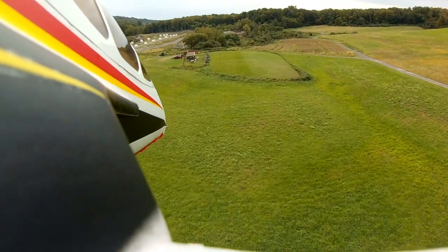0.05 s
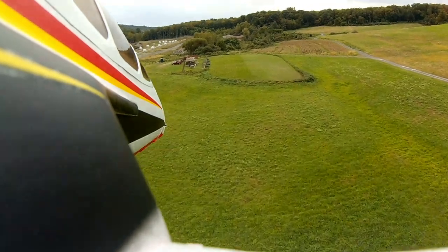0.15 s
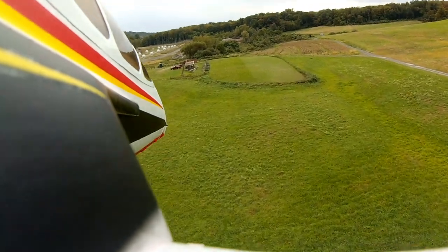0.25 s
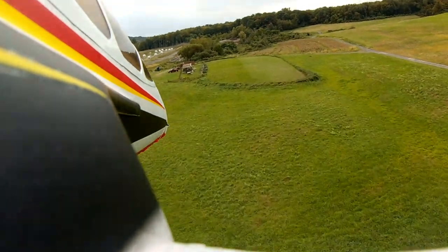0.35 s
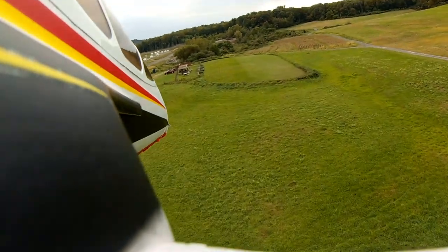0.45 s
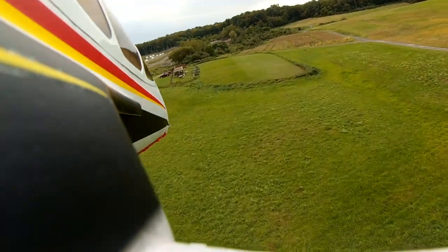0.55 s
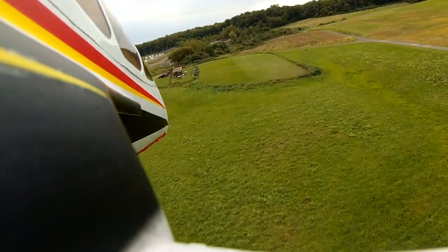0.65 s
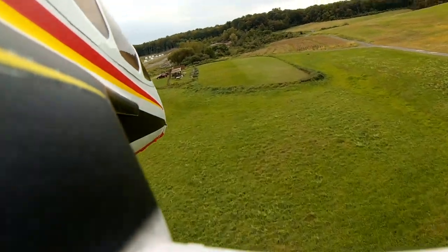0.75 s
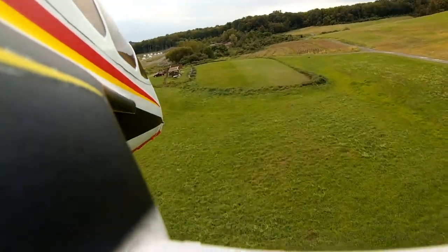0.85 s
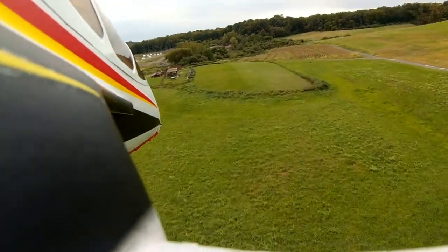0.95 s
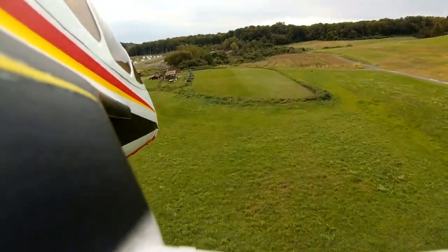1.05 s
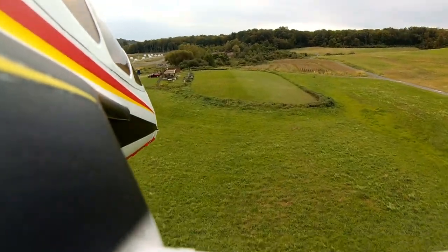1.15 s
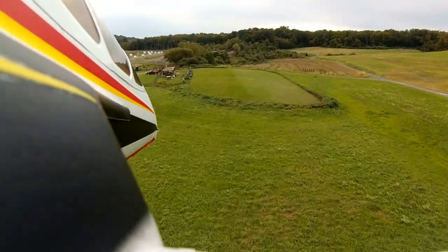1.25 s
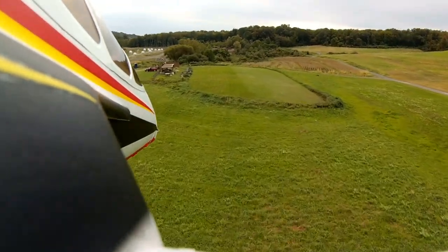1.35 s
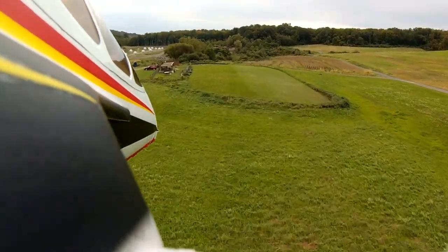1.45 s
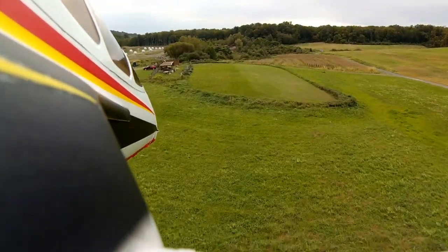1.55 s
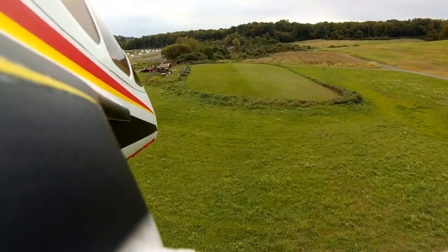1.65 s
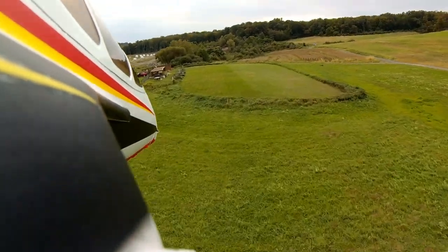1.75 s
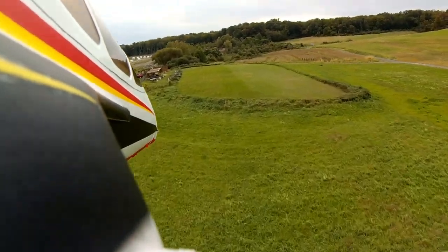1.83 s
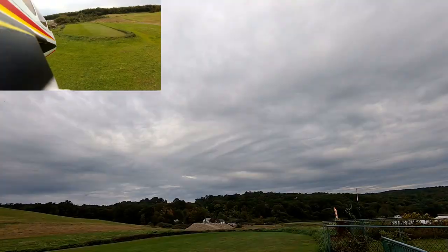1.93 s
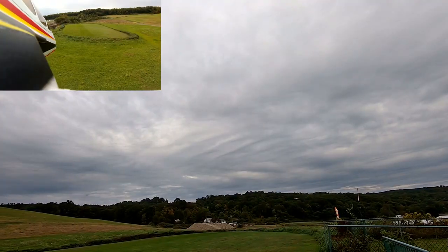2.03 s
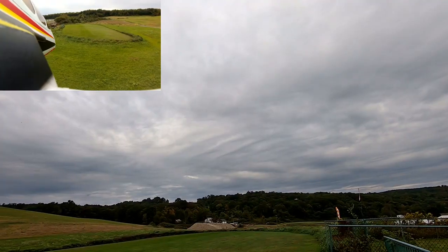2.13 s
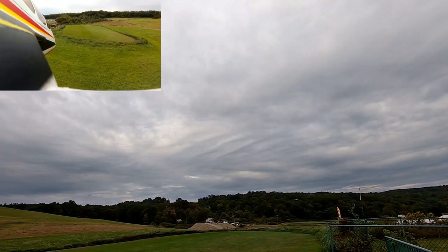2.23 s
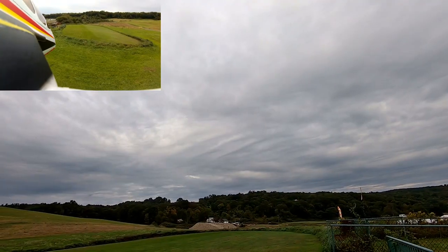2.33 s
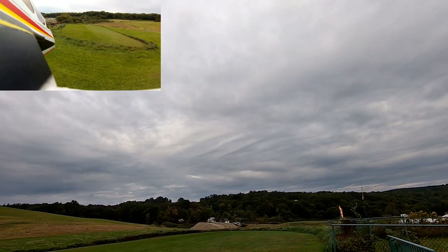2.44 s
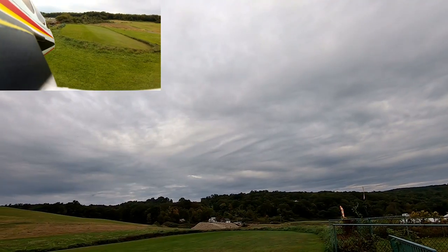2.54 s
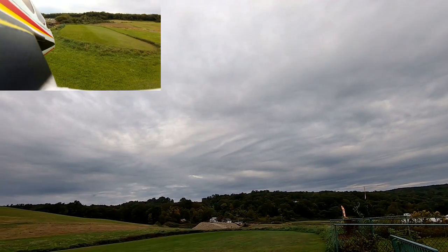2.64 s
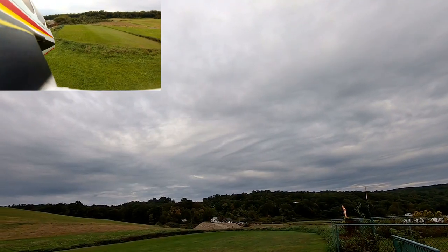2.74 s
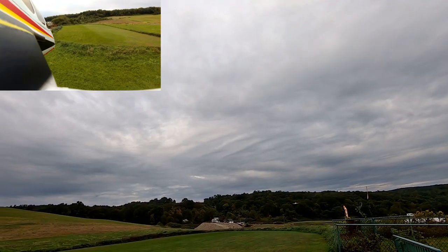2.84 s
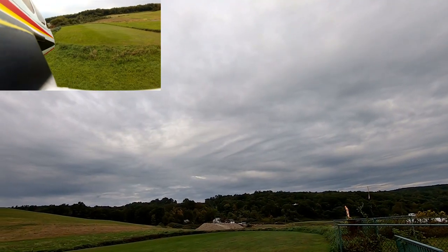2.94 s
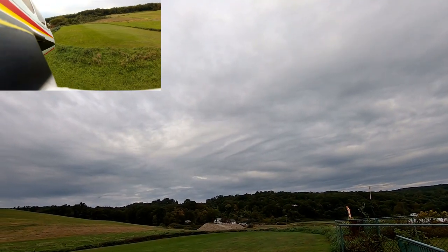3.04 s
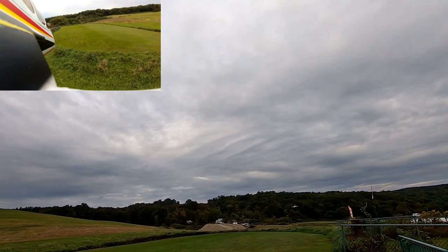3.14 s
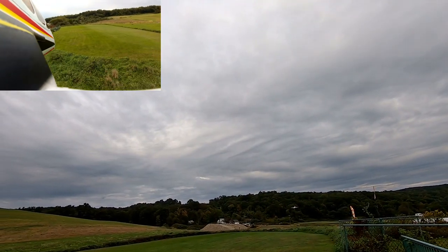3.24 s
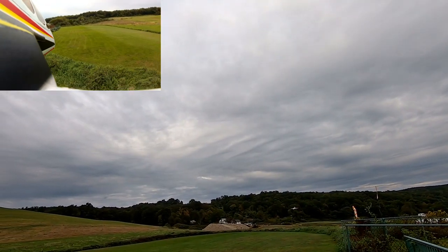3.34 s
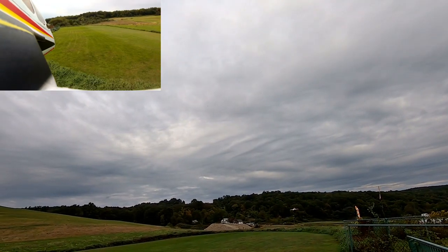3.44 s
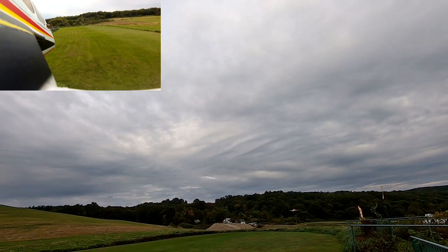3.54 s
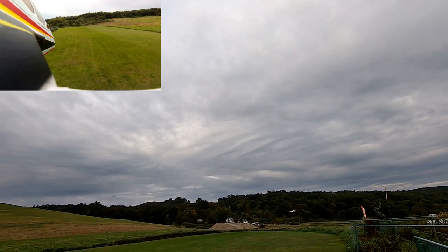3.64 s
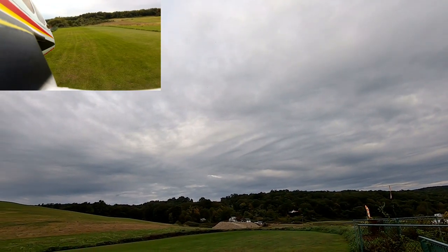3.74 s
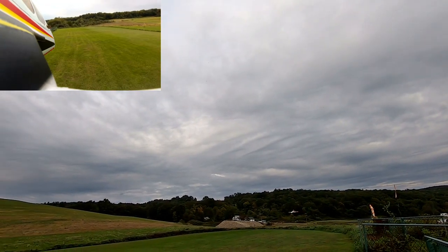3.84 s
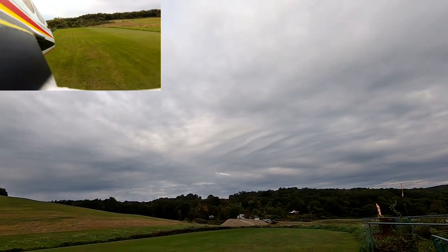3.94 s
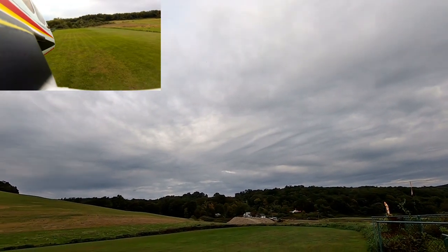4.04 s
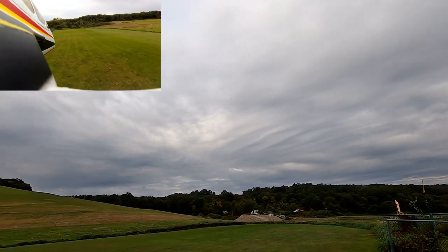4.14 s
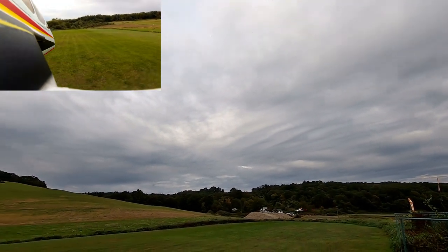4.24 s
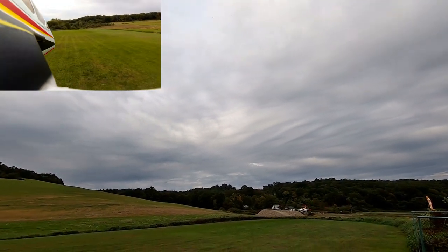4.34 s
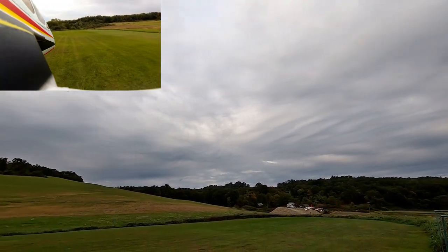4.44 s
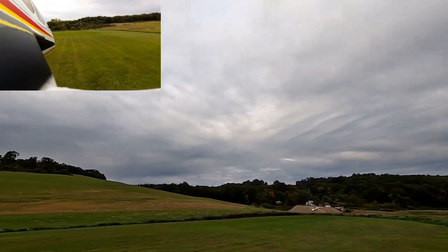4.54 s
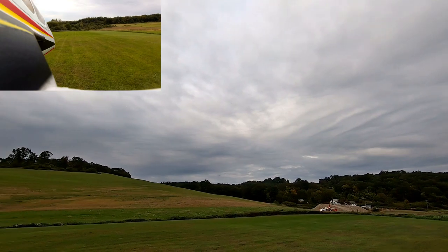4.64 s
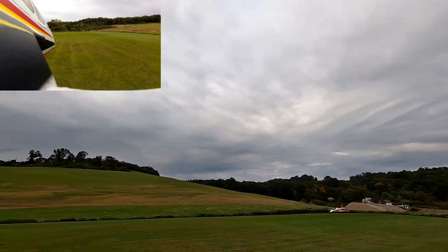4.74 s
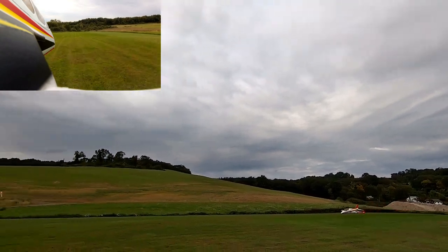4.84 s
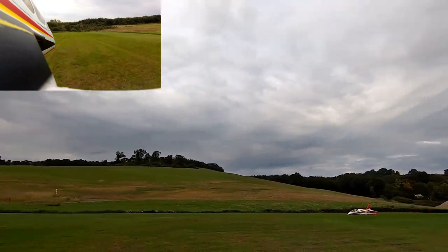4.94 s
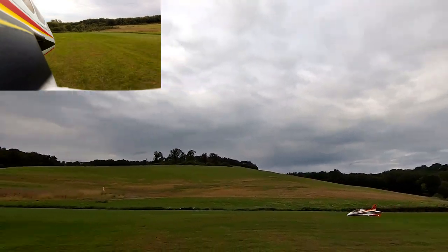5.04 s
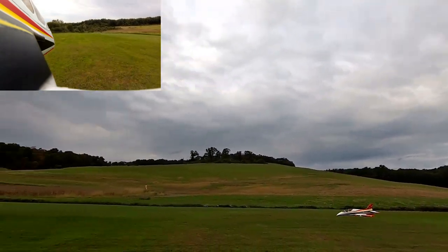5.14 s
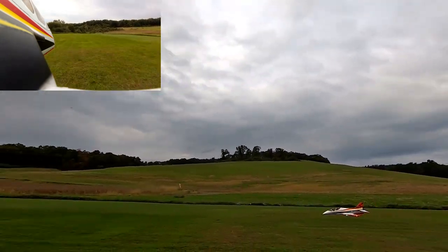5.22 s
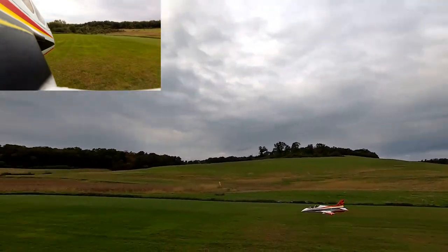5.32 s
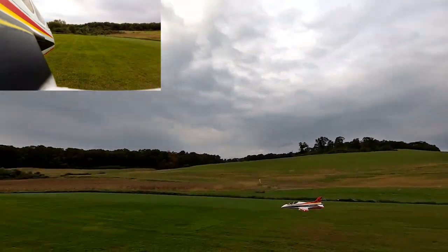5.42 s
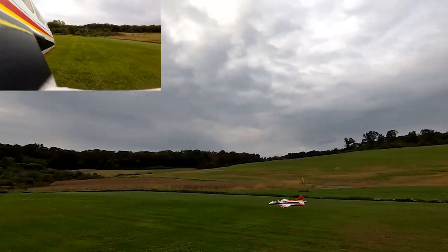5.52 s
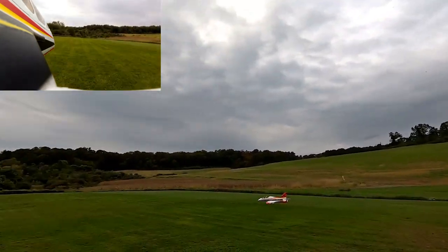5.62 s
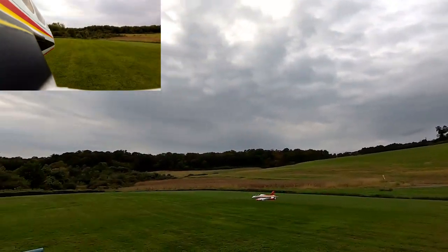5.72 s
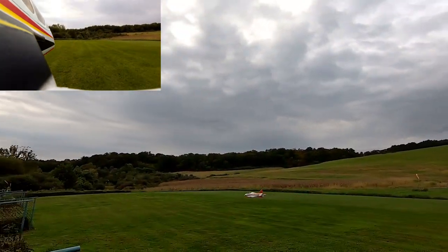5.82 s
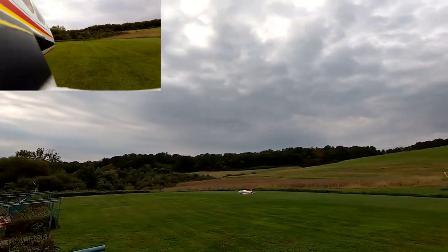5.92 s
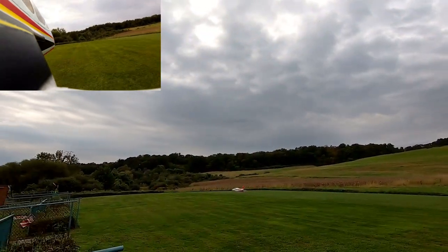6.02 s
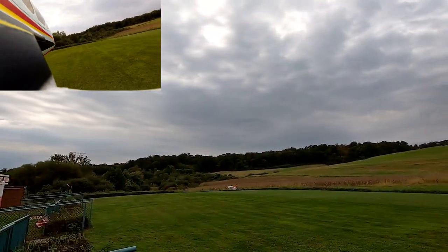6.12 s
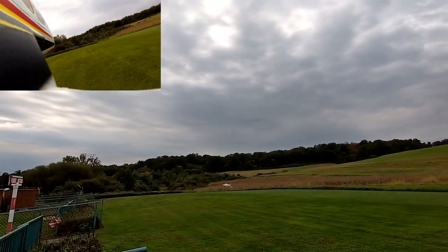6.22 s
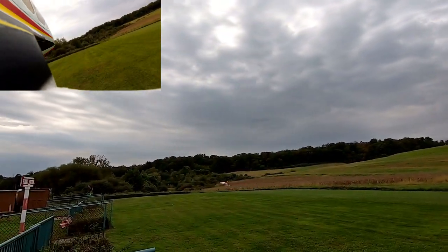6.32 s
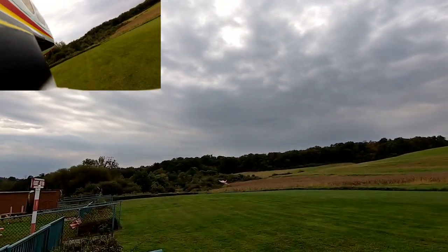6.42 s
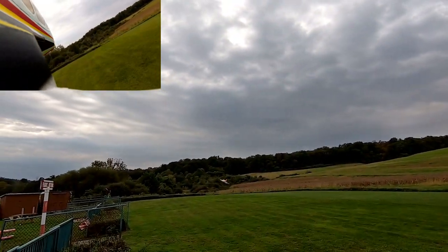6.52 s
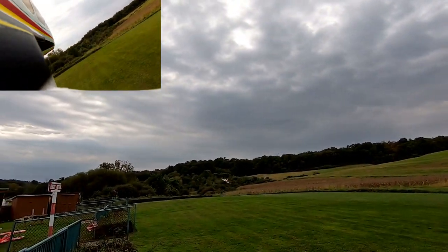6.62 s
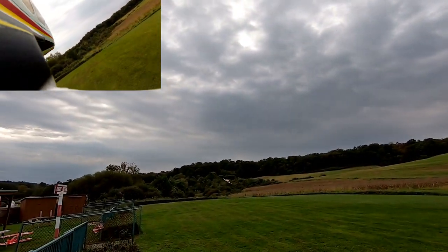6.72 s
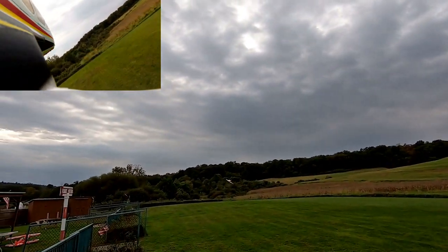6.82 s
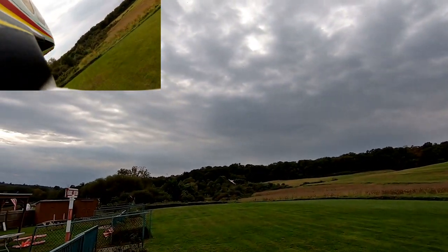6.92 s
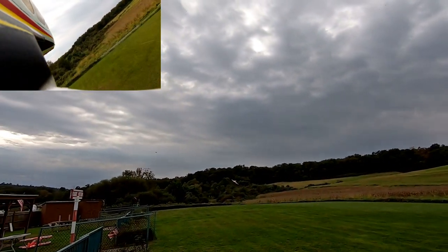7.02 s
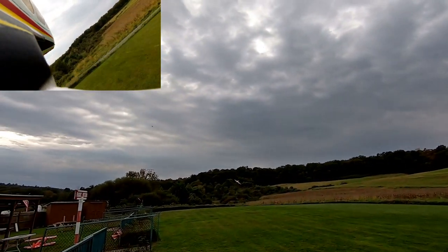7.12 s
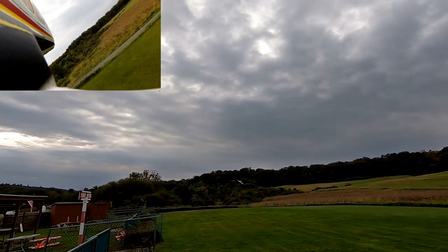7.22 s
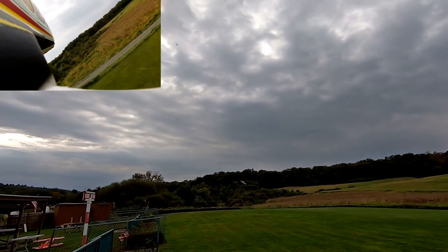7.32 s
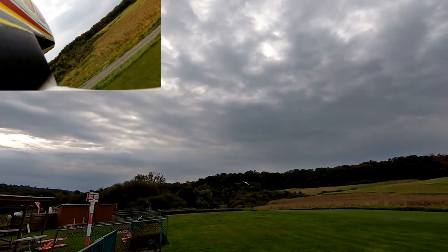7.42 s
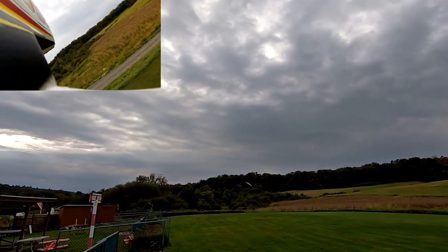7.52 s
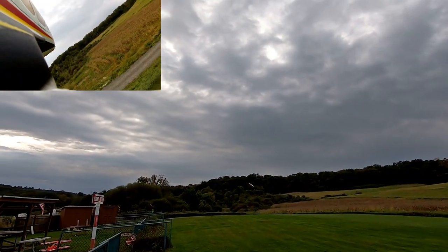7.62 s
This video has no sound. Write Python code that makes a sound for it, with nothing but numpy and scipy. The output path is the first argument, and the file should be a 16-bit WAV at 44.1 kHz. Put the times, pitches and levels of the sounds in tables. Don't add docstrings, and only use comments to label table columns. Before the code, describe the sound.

Outdoors over a grass field, a far engine drones and throttles back while a cricket trills faintly. A small ducted-fan jet approaches as a thin, hollow hiss, its ground echo sweeping through the noise. It bursts past close by, whine jumping up in pitch as it throttles up, then fades quickly. A camera microphone catches finger ticks and light wind.

```python
import sys
import numpy as np
from scipy import signal
from scipy.fft import rfft, irfft
from scipy.io import wavfile
from scipy.ndimage import uniform_filter1d, map_coordinates

SR = 44100
rng = np.random.default_rng(int(sys.argv[2]) if len(sys.argv) > 2 else 0)


def volts_from_db(level):
    exponent = np.asarray(level, float) / 20
    return 10 ** exponent


def to_wav(sig):
    pcm = np.clip(np.atleast_2d(sig), -1, 1) * 32767
    pcm = np.round(pcm).astype(np.int16)
    wavfile.write(sys.argv[1], SR, pcm.T)


N = 338230

# (time [s], nearness [dB], exhaust turned to camera [dB], left-right [dB])
FLIGHT = [(0, -47.5, -4, -5), (.7, -35.5, -9.5, -4.5), (1.41, -33.5, -8, -6.5), (2.41, -27, -8, -6.5),
          (3.35, -18, -10, -6.5), (4.02, -17, -7, -7.5), (4.83, -12, -2.5, -10), (5.08, -11, -0.5, -9),
          (5.42, -12.5, 3.5, -10), (5.7, -3.5, 3.5, -9), (5.94, -1, -2.6, -8.5), (6.13, -1.5, 0.5, -6.5),
          (6.41, -4.5, 1, -5.5), (6.86, -11.5, 4.5, -5), (7.09, -13.5, 5, -4.5), (7.4, -21.5, 10, -4.5),
          (7.67, -29.5, 13.5, -3)]
# (time [s], extra path delay [ms])
ECHO_DELAY = [(0, .92), (1.5, .795), (1.9, .755), (2.7, .63), (3.5, .55), (3.9, .52), (4.5, .51),
              (5.1, .715), (5.34, .83), (5.58, .875), (5.7, .9), (5.82, .865), (5.94, .77), (6.18, .695),
              (6.4, .68), (6.54, .71), (6.78, .82), (7.67, 1.07)]
# (frequency [Hz], density [dB per Hz]); duct at approach speed
ROAR = [(240, -49.5), (400, -11), (424, -14), (463, -17), (616, -5), (745, -2), (850, -4.5), (977, -5),
        (1100, -2.5), (1400, -7.5), (1630, -9), (2170, -13), (2300, -11.5), (2990, -28), (5060, -120)]
DUCT = [(800, -26.5), (1400, -12), (1900, -11.5), (2400, 0), (2900, -0.5), (3600, -3.5), (4600, -12),
        (6000, -18.5), (10000, -120)]
HISS = [(2590, -14), (4400, -2), (6670, -1.5), (7460, 0.5), (8340, -13), (8900, -20), (11600, -63.5),
        (19600, -120)]
TOP_HISS = [(5120, -56), (8700, 0.5), (9370, -1), (10700, -8.5), (11900, -18.5), (13800, -18.5),
            (15400, -31)]
# (level at loudest [dB], nearness slope [dB/dB], exhaust slope [dB/dB])
LAYERS = [
    (-39, 0.68, 1),
    (-37, 0.5845, 0.103),
    (-34.5, 1, 0),
    (-47, 1.34, 0.25),
]
# (time [s], half length [s], frequency [Hz], width [log Hz], level
# [dB])
BANDS = [
    (0, 3.5, 760, .08, 8),
    (4.3, .6, 2300, .3, 3),
    (4.9, .6, 11000, .25, 3),
    (5.25, .2, 5600, .1, 6),
    (5.47, .16, 545, .09, 10),
    (5.75, .13, 770, .09, 6),
    (6.12, .25, 980, .1, 7),
    (6.0, .8, 1430, .06, -4),
    (7.4, .4, 1270, .1, -6),
]
# (time [s], blade-pass frequency [Hz])
BLADE_PASS = [(0, 2690), (.6, 2813), (1, 2821), (3.6, 2812), (4.6, 2793), (5, 2770), (5.2, 2737),
              (5.37, 2686), (5.44, 2830), (5.5, 2935), (5.64, 3262), (5.8, 3427), (5.92, 3495),
              (5.99, 3720), (6.16, 3773), (6.5, 3746), (6.95, 3721), (7.67, 3706)]
# (time [s], blade-pass level [dB], octave re blade-pass [dB])
BLADE_SONG = [(0, -70, -23), (.7, -68.5, -3), (1.5, -66.5, -3), (2.1, -75.5, -0.5), (2.8, -64, 0.5),
              (3.6, -66.5, -3), (4.3, -50, -4.5), (4.6, -48.5, -14), (4.95, -47.5, -11), (5.28, -50, 2.5),
              (5.53, -46.5, -3.5), (5.6, -35, -8), (5.84, -36.5, -10), (6.1, -33.5, -7), (6.55, -39.5, -1),
              (6.8, -57, -1), (7.28, -51.5, -17), (7.5, -51.5, -26)]
# (hold from [s], hold to [s], level [dB], rise [dB/s], fall [dB/s])
PASSING = [
    (3.4, 5.35, -66.5, 22, 25),
    (5.25, 5.75, -44, 12.5, 19),
]
# (time [s], firing frequency [Hz], level [dB])
DRONE = [(0, 131, -39.5), (.3, 131.5, -38), (.64, 132, -38.5), (.76, 136, -45.5), (1.1, 144, -47.5),
         (1.45, 149.5, -52), (2.2, 153, -48.5), (3.1, 151.5, -51), (4.3, 148.7, -52), (7.67, 147.5, -51)]
# (time [s], frequency [Hz], level [dB])
FAINT_ENGINE = [(.7, 264, -60), (1.4, 264, -67), (2, 264, -62), (2.6, 264.5, -73), (3.2, 247, -64),
                (3.7, 240, -62), (4.3, 247, -63), (4.9, 277, -64), (5.4, 286, -85)]
# (time [s], frequency [Hz])
THROB_PITCH = [(0, 78.5), (3.4, 71.3), (4.2, 76), (5.6, 80.8), (7.67, 73)]
# (time [s], peak level [dB])
THROB_SWELLS = [(.3, -52), (.65, -54), (1.8, -54), (2.2, -57), (2.7, -53), (3.05, -55), (3.35, -53),
                (5.55, -57), (6.3, -71)]
# (time [s], wing strokes [1/s])
STROKES = [(0, 17.5), (1, 17.45), (1.6, 17.2), (2.3, 16.9), (7.67, 16.9)]
# (time [s], peak level [dB], frequency [Hz], length [s])
TICKS = [
    (1.29, -56, 1300, .02),
    (1.805, -50, 450, .03),
    (2.372, -46, 4300, .008),
    (4.447, -40, 800, .012),
    (4.466, -39, 700, .012),
    (7.164, -44, 8500, .004),
    (7.262, -54, 9500, .003),
]
# (frequency [Hz], share of left-right level [1], likeness [0-1], left lead [rad])
SHADE = [(200, .05, .98, 0), (500, .3, .97, -.3), (800, .9, .95, -.5), (1050, 1.6, .9, 0),
         (1400, 1.2, .75, 1), (1900, .3, .85, .1), (2500, .9, .93, 0), (3500, .6, .95, -.3),
         (5200, .9, .88, -1.2), (6500, .3, .8, -.4), (7400, -.5, .8, -1.1), (9000, .2, .7, .5),
         (10500, .4, .55, 1.7), (12000, .2, .35, 1.6), (15000, .2, .3, 1.6)]
# (frequency [Hz], density [dB per Hz])
RUMBLE = [(18, -31), (30, -25.5), (101, -11), (150, -2.5), (176, -9), (205, -7), (308, -11.5), (520, -32),
          (680, -69), (1140, -120)]
LEAVES = [(210, -35.5), (350, -6.5), (681, -16), (802, -11), (1970, -16), (2760, -26), (3880, -20.5),
          (6860, -10.5), (9000, -43), (11700, -76), (19800, -120)]
BUFFET = [(15, -120), (22, -16.5), (40, -9), (60, -0.5), (90, -5), (140, -120)]
# (time [s], peak level [dB])
GUSTS = [(.3, -53.5), (2.7, -63), (5.6, -63), (5.95, -60), (7.6, -54.5)]


def rush():
    hz, t, z = noise(patchy_db=0.58)
    near_db, exhaust_db, pan_db = curves(FLIGHT, t)
    bands_db = 0
    for s, half_s, band_hz, width, db in BANDS:
        bands_db = bands_db + db * bell(t, s, half_s) * bell(np.log(hz + 1), np.log(band_hz), width)
    path = echo(hz, t)
    speed = (curves(BLADE_PASS, t)[0] / 2810) ** (0.95 * np.clip(hz / 1600 - 1, 0, 1))
    shapes = [
        layer(ROAR, hz, path),
        layer(DUCT, hz / speed, path),
        layer(HISS, hz, path),
        layer(TOP_HISS, hz, path),
    ]
    power = 0
    for shape, (db, near_slope, exhaust_slope) in zip(shapes, LAYERS):
        level_db = db + near_slope * near_db + exhaust_slope * exhaust_db
        power = power + np.abs(volts_from_db(level_db) * shape) ** 2
    gains, alike = ports(hz, pan_db)
    pair = spread(z, alike) * gains
    return volts_from_db(0.26 * wobble(9)) * sound(pair * np.sqrt(power) * volts_from_db(bands_db))


def whine():
    t = np.arange(N) / SR
    hz = curves(BLADE_PASS)[0]
    pan_db = curves(FLIGHT)[-1]
    song_db, octave_db = curves(BLADE_SONG)
    strain = 1 + uniform_filter1d(np.abs(np.gradient(hz)), 4000) * SR / 3000
    dip_s, dip_span_s, dip_db = (5.655, 5.835, 6.01), .02, -15
    song_db = song_db + dip_db * sum(bell(t, s, dip_span_s) for s in dip_s)
    third_db, shaft_db = (passing(t, *row) for row in PASSING)

    out = np.real(tone(hz / 9, shaft_db, 2, blur=.15) * ports(hz / 9, pan_db)[0])
    orders = [  # order, level dB, flutter dB, blur
        (1, song_db, 1.7, .3),
        (2, song_db + octave_db, 2.2, .5),
        (3, third_db, 2.6, .55),
    ]
    for order, level_db, flutter_db, blur in orders:
        partial = tone(order * hz, level_db, flutter_db * strain, blur * strain)
        out = out + np.real(partial * ports(order * hz, pan_db)[0])
    return out


def passing(t, start_s, end_s, db, rise_db_s, fall_db_s):
    return db - rise_db_s * np.clip(start_s - t, 0, None) - fall_db_s * np.clip(t - end_s, 0, None)


def engines():
    hz, load_db = curves(DRONE)
    drone = 0
    for k, (db, slope) in enumerate([(-39, 1), (-55.5, 1.1), (-67, 1.7)]):
        drone = drone + tone((k + 1) * hz, db + slope * (load_db + 39), 1.1 + k, blur=.12)
    faint = tone(*curves(FAINT_ENGINE), 2, blur=.2)
    throb_gain = swells(THROB_SWELLS, span_s=0.14, floor_db=-66.5)
    throb = throb_gain * tone(curves(THROB_PITCH)[0], 0, 4, blur=.4)
    return np.real(drone + faint + throb)


def cricket():
    level_db, tires_s, fade_db_s = -67, 4.5, -5
    cycle = (np.cumsum(curves(STROKES)[0]) / SR + .02) % 1
    stroke = np.clip(cycle / .6, 0, 1)
    hz = 8020 - 480 * stroke ** 1.6
    shape = np.sin(np.pi * stroke) ** 2 * volts_from_db(2.5 * wobble(300))
    level_db = level_db + fade_db_s * np.clip(np.arange(N) / SR - tires_s, 0, None)
    return shape * np.real(tone(hz, level_db, .8, blur=.4)) * volts_from_db([[.6], [-.6]])


def handling():
    width, pan_db = .6, -4
    out, t = np.zeros(N + SR), np.arange(2048) / SR
    for s, db, hz, length_s in TICKS:
        band = np.exp(-((np.fft.rfftfreq(2048, 1 / SR) / hz - 1) / width) ** 2)
        puff = unit(irfft(rfft(rng.standard_normal(2048)) * band))
        puff = puff * t / length_s * np.exp(1 - 3 * t / length_s)
        out[round(s * SR):][:2048] += volts_from_db(db) * puff
    return out[:N] * volts_from_db([[pan_db / 2], [-pan_db / 2]])


def far_rumble():
    near_db, exhaust_db, _ = curves(FLIGHT)
    jet_db = -48.5 + 0.63 * near_db + 0.27 * exhaust_db
    level = np.hypot(volts_from_db(-59.5), volts_from_db(jet_db))
    hz, _, z = noise(patchy_db=3.4, size=4096)
    return level * sound(spread(z, 0.89) * layer(RUMBLE, hz))


def leaves():
    hz, _, z = noise(patchy_db=1.5)
    return volts_from_db(-64.0) * sound(spread(z, 0.054) * layer(LEAVES, hz))


def wind():
    hz, _, z = noise(patchy_db=6.5, size=4096)
    gain = swells(GUSTS, span_s=0.21, floor_db=-70)
    return gain * sound(spread(z, 0.74) * layer(BUFFET, hz))


def echo(hz, t):
    delay_ms = curves(ECHO_DELAY, t)[0]
    cycles = hz * delay_ms / 1000 + (hz / 4400 - 1) * .13
    share = 1.33 - 1.0 * delay_ms - .25 * bell(t, 5.4, .85)
    share = np.clip(share, 0, .76) / (1 + (hz / 14000) ** 2)
    return 1 - share * np.exp(-2j * np.pi * cycles)


def ports(hz, pan_db):
    share, alike, lead_rad = along(SHADE, hz)
    tilt = volts_from_db(share * pan_db / 2) * np.exp(1j * lead_rad / 2)
    return np.array([tilt, 1 / tilt]) * 2 / (np.abs(tilt) + 1 / np.abs(tilt)), alike


def tone(hz, level_db, flutter_db, blur):
    phase = 2 * np.pi * np.cumsum(hz) / SR + blur * wobble(40)
    return np.sqrt(2) * volts_from_db(level_db + flutter_db * wobble(30)) * np.exp(1j * phase)


def noise(patchy_db, size=1024):
    hz, t, z = signal.stft(rng.standard_normal((2, N)), SR, nperseg=size)
    patches = uniform_filter1d(rng.standard_normal(z.shape[1:]), 9, 0)
    patches = uniform_filter1d(patches, 5, 1)
    return hz[:, None], t, z * volts_from_db(patchy_db * unit(patches)) * np.sqrt(size / 3)


def layer(spectrum, hz, path=1):
    gain = volts_from_db(along(spectrum, hz)[0]) * path
    return gain / np.sqrt(np.mean(np.abs(gain) ** 2, 0))


def spread(z, alike):
    turn = np.arccos(np.clip(alike, 0, 1)) / 2
    return z[0] * np.cos(turn) + z[1] * np.sin(turn) * np.array([1, -1])[:, None, None]


def sound(z):
    size = 2 * z.shape[1] - 2
    return signal.istft(z * np.sqrt(3 / size), SR, nperseg=size)[1][:, :N]


def swells(rows, span_s, floor_db):
    t = np.arange(N) / SR
    return volts_from_db(floor_db) + sum(volts_from_db(db) * bell(t, s, span_s) for s, db in rows)


def bell(x, center, span):
    return np.exp(-((x - center) / span) ** 2)


def wobble(rate_hz):
    knots = rng.standard_normal(int(N * rate_hz / SR) + 4)
    return map_coordinates(knots, [np.arange(N) * rate_hz / SR])


def curves(rows, t=None):
    s, *cols = np.transpose(rows)
    t = np.arange(N) / SR if t is None else t
    return [np.interp(t, s, c) for c in cols]


def along(points, hz):
    f, *cols = np.transpose(points)
    return [np.interp(np.log(hz + 1), np.log(f + 1), c) for c in cols]


def unit(x):
    return x / np.sqrt(np.mean(x ** 2) + 1e-20)


def scene():
    start = np.clip(np.arange(N) / 25, 0, 1)
    jet = rush() + whine()
    field = far_rumble() + leaves() + wind()
    return (jet + engines() + cricket() + handling() + field) * start


def top_cut(x):
    return signal.sosfilt(signal.butter(12, 15590, fs=SR, output="sos"), x)


def record(dry):
    return top_cut(dry)


dry = scene()
out = record(dry)
to_wav(out)
```